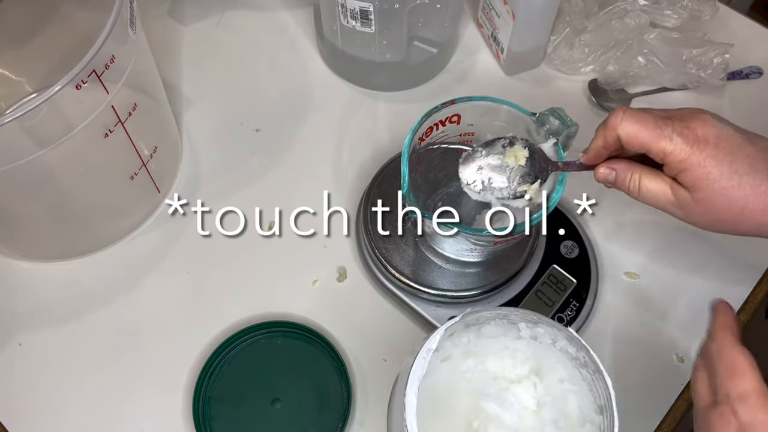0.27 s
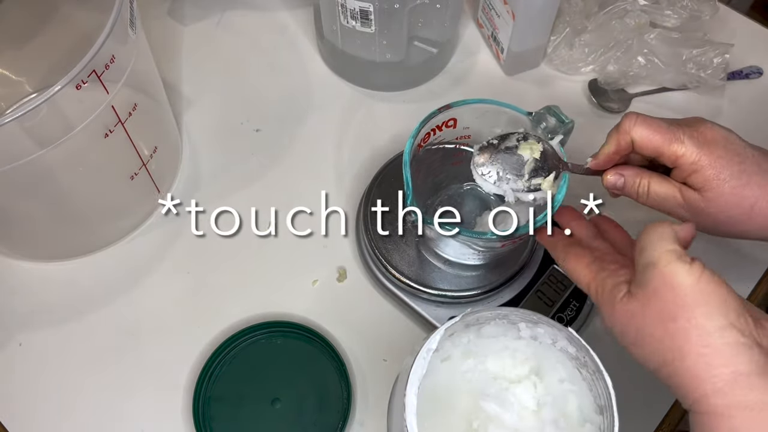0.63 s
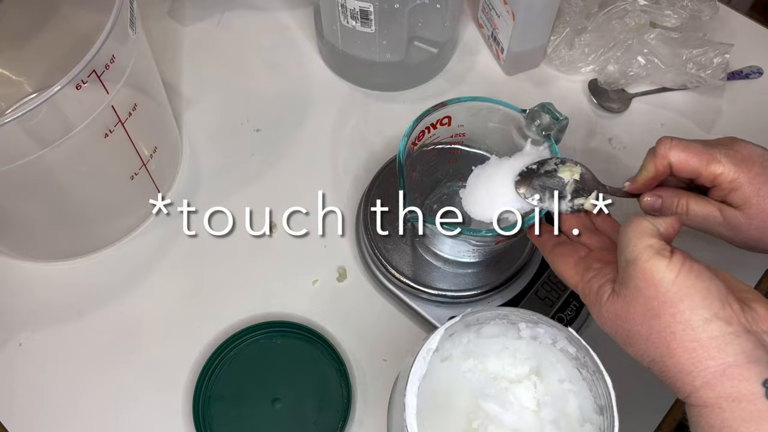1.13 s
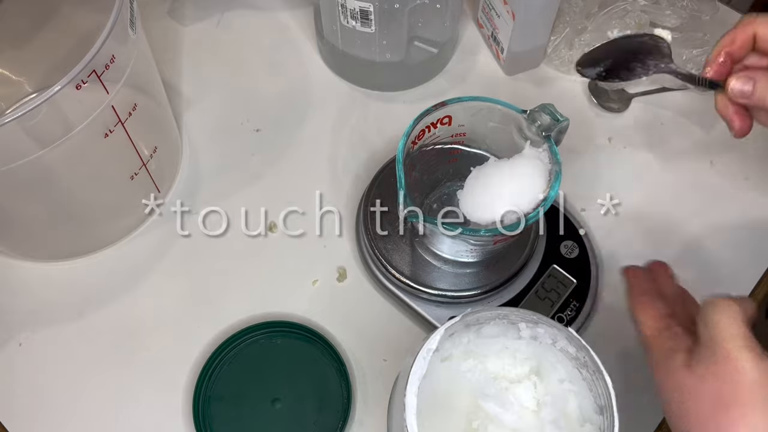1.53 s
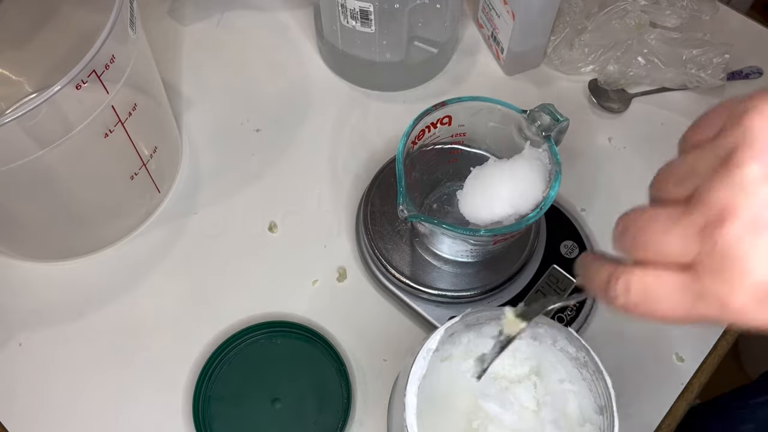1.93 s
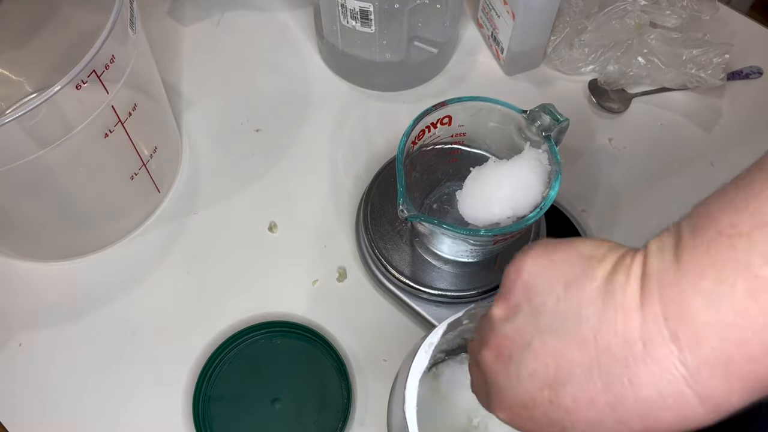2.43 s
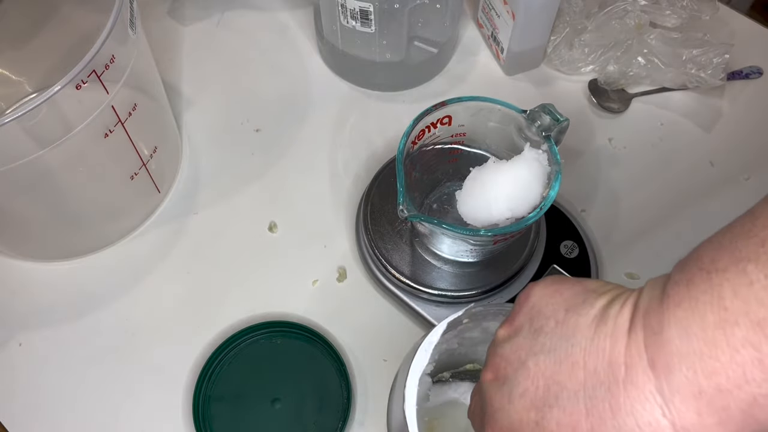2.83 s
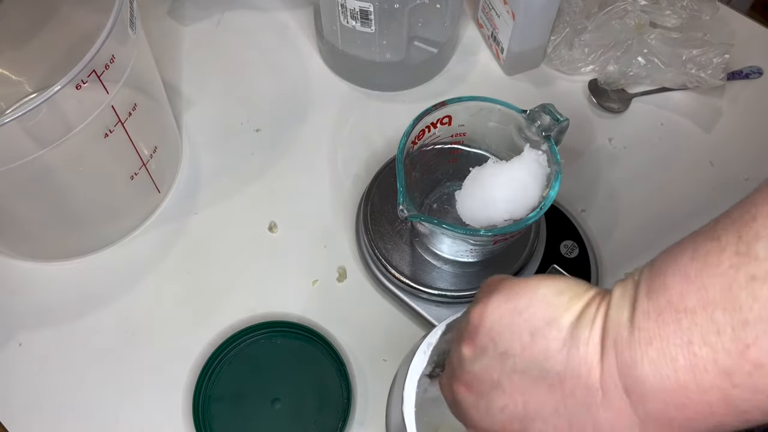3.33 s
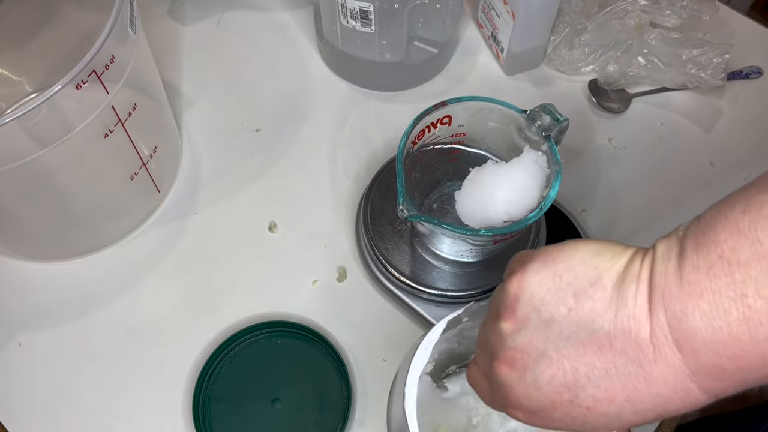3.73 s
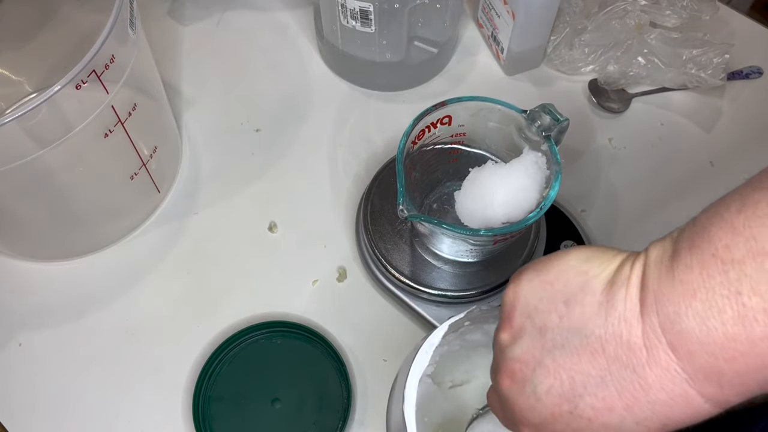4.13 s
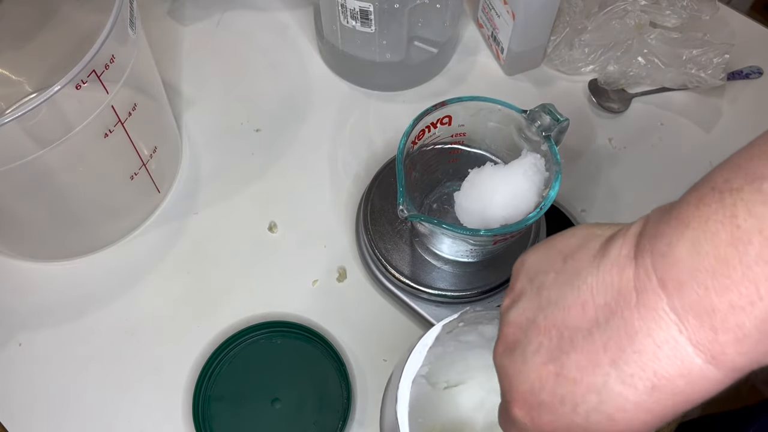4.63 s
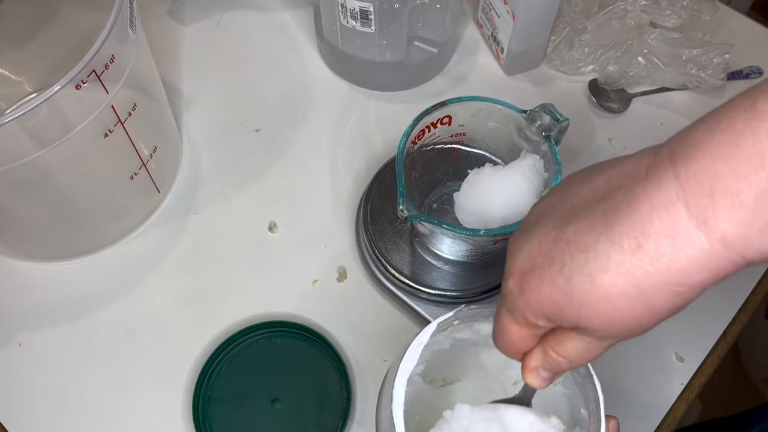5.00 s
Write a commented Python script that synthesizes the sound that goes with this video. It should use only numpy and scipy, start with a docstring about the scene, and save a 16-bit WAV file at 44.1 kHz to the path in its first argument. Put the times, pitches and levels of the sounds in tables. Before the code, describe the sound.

Quiet close kitchen handling: greasy rubbing and tiny clicks, a spoon digging in a tub of solid oil, one hard clack near the end.

```python
"""Spoon on glass jug and plastic tub of solid fat

A spoon taps a glass jug, a finger wipes solid oil off the spoon, then it digs into a plastic tub on a counter.
Blows ring sums of decaying modes; grains of noise make fat and skin rub and crackle, gliding tones squeak.
Small ticks sound during the wipe, later on the tub, with one hard knock; decaying noise is the small hard room.
An appliance hums and whines below, made of narrow noise and a wavering sine; two close microphone ports hear it.
"""
import sys
import numpy as np
from scipy import signal
from scipy.fft import rfft, irfft, next_fast_len
from scipy.io import wavfile

SR = 44100
rng = np.random.default_rng(int(sys.argv[2]) if len(sys.argv) > 2 else 0)


def undo_db(level):
    """Turn decibels back into plain size, where 20 dB means ten times bigger."""
    steps = np.asarray(level, float) / 20
    return 10 ** steps


def inscribe(sig):
    """Save sig as 16-bit PCM at rate SR to the path in sys.argv[1].

    A 1-D sig is mono; a 2-D sig holds one channel per row.
    Samples are clipped to [-1, 1] before scaling.
    """
    pcm = np.round(np.clip(np.atleast_2d(sig).T, -1, 1) * 32767)
    wavfile.write(sys.argv[1], SR, pcm.astype(np.int16))


N = 231966


def unit_rms(x):
    """Normalisation: scale a signal to unit root mean square."""
    return x / np.sqrt(np.mean(x ** 2) + 1e-20)


def at_hz(points, hz):
    """Logarithmic interpolation: read a spectrum along a log-frequency axis."""
    points = np.array(points)
    return np.interp(np.log(hz), np.log(points[:, 0]), points[:, 1])


def drift(rate_hz):
    """Low-passed random process: two equal poles leave only slow fluctuation, of unit rms."""
    stride = 40   # computed at every 40th sample, then interpolated
    pole = np.exp(-2 * np.pi * rate_hz * stride / SR)
    white = rng.standard_normal(N // stride + 2002)
    slow = signal.lfilter([1], [1, -2 * pole, pole ** 2], white)[2000:]
    return np.interp(np.arange(N) / stride, np.arange(len(slow)), unit_rms(slow))


def ring(force, hz, t60_s):
    """Damped oscillator: a unit click starts a decaying sine of height 1."""
    radius = undo_db(-60 / (t60_s * SR))
    angle = 2 * np.pi * hz / SR
    feedback = [1, -2 * radius * np.cos(angle), radius ** 2]
    return signal.lfilter([0, np.sin(angle)], feedback, force + 1e-18)


def resonance(x, hz, width_hz):
    """Resonance bandwidth: damping sets the width of the band passed; unit rms."""
    return unit_rms(ring(x, hz, np.log(1000) / (np.pi * width_hz)))


def left_right(mid, side, likeness):
    """Interchannel correlation: the balance of mid and side power sets how alike left and right are."""
    return np.sqrt(1 + likeness) * mid + np.sqrt(1 - likeness) * side * [[1], [-1]]


def band_pass(x, low_hz, high_hz):
    """Band filtering: pass the frequencies between two edges."""
    return signal.sosfilt(signal.butter(2, [low_hz, high_hz], "band", fs=SR, output="sos"), x)


def coloured(white, spectrum, patchy_db, likeness):
    """Spectral shaping: third-octave bands of (draw, mid/side) noise flicker separately; unit rms."""
    out = 0
    edges_hz = 16 * 2 ** np.arange(0, 9.9, 1 / 3)
    for k, (low, high) in enumerate(zip(edges_hz, edges_hz[1:])):
        hz = np.sqrt(low * high)
        flicker = drift(30)
        if spectrum[0][0] < hz < spectrum[-1][0]:
            mid, side = band_pass(white[k % 2], low, high)   # neighbouring bands use separate draws
            alike = np.clip(at_hz(likeness, hz), -1, 1)
            gain = undo_db(at_hz(spectrum, hz) + patchy_db * flicker)
            out = out + gain * left_right(mid, side, alike)
    return unit_rms(out)


def strike(times_s, levels_db, modes, spread_db, force):
    """Modal excitation: every blow, of shape force[k], drives each mode with a strength of its own."""
    out = np.zeros(N)
    chance_db = rng.normal(0, spread_db, (len(times_s), len(modes)))
    for m, (hz, mode_db, t60_s) in enumerate(modes):
        push = np.zeros(N)
        for k, s in enumerate(times_s):
            i = round(s * SR)
            level_db = levels_db(hz)[k] + mode_db + chance_db[k, m]
            push[i:i + len(force[k])] += undo_db(level_db) * np.asarray(force[k])
        out += (-1) ** m * ring(push, hz, t60_s)   # neighbouring modes move against each other
    return out


def swells(start_s, length_s, level_db):
    """Amplitude envelope: each row swells, holds and fades by one rule; rows add in power."""
    rise_share, fall_share = 0.27, 0.57   # parts of the length spent swelling and fading
    stride = 32
    t = np.arange(0, N + stride, stride) / SR
    part = (t - np.reshape(start_s, (-1, 1))) / np.reshape(length_s, (-1, 1))
    shape = np.clip(np.minimum(part / rise_share, (1 - part) / fall_share), 0, 1) ** 2
    gain = np.sqrt(np.sum((undo_db(level_db)[:, None] * shape) ** 2, axis=0))
    return np.interp(np.arange(N) / stride, np.arange(len(gain)), gain)


# Spectral density of the rumble before it is scaled to unit rms: frequency_hz, density_db
RUMBLE_SPECTRUM = [(15, -54.5), (30, -17), (48, -7.5), (80, -5), (160, -2.5), (290, -8), (420, -9.5),
                   (520, -14), (1000, -19.5), (2000, -26.5), (3000, -36), (4000, -42), (6000, -48),
                   (13000, -50.5)]
# Correlation of left and right in diffuse sound, also used by kitchen(): frequency_hz, likeness (1 = identical)
DIFFUSE_LIKENESS = [(60, 0.98), (130, 0.95), (290, 0.69), (640, -0.22), (1400, -0.22), (2500, 0.87),
                    (5000, 0.1), (8000, 0.92), (12000, 1)]
# Wavering rms level of the mains hum: time_s, level_db
MAINS_LEVEL = [(0.0, -52), (0.1, -53.5), (0.23, -69), (0.6, -53.5), (0.97, -62), (1.02, -55.5), (1.62, -68),
               (1.71, -58), (2.42, -56), (2.59, -63), (3.69, -54.5), (3.91, -73), (4.09, -55.5),
               (4.53, -55), (4.61, -59.5), (5.26, -64)]
# Faint overtones of the hum, and the whine: frequency_hz, width_hz (of each of two resonances), level_db
OVERTONES = [(109, 10, -83), (185, 14, -64), (233.2, 11, -64), (295.3, 9, -67), (399.7, 10, -67),
             (8354, 280, -84)]


def room_tone():
    """Stationary noise and tones: low house rumble, wavering mains hum, faint overtones and a thin whine."""
    rumble_db, mains_hz = -54.5, 59.6
    rumble = coloured(rng.standard_normal((2, 2, N)), RUMBLE_SPECTRUM, patchy_db=1.9, likeness=DIFFUSE_LIKENESS)
    level_db = np.interp(np.arange(N) / SR, *np.transpose(MAINS_LEVEL))
    phase = 2 * np.pi * np.cumsum(mains_hz + 0.66 * drift(1.22)) / SR
    mains = undo_db(level_db) * np.sqrt(2) * np.sin(phase)
    overtones = 0
    for hz, width_hz, db in OVERTONES:
        narrow = resonance(rng.standard_normal(N), hz, width_hz)
        overtones = overtones + undo_db(db) * resonance(narrow, hz, width_hz)
    return undo_db(rumble_db) * rumble + mains + overtones


# Reverberation time: frequency_hz, t60_s
REVERB_TIME = [(200, 0.39), (600, 0.27), (1500, .44), (3000, 0.52), (8000, 0.33), (12000, .3)]
# Spectral density of the reflections before scaling to unit energy: frequency_hz, density_db
REVERB_COLOUR = [(200, -2.5), (600, 7.5), (900, 3), (1300, 4.5), (2000, -0.5), (4000, -6), (7000, 1),
                 (12000, -5)]


def kitchen(x):
    """Diffuse reverberation: noise sets in as the first walls answer and decays at each band's own rate."""
    t = np.arange(SR // 2) / SR
    onset = 1 - np.exp(-(t / 0.002) ** 2)
    edges_hz = 180 * 2 ** np.arange(0, 6.6, .5)
    white = rng.standard_normal((2, 2, len(t)))
    response = 0
    for k, (low, high) in enumerate(zip(edges_hz, edges_hz[1:])):
        mid, side = band_pass(white[k % 2], low, high)
        hz = np.sqrt(low * high)
        alike = np.clip(at_hz(DIFFUSE_LIKENESS, hz), -1, 1)
        fade = undo_db(at_hz(REVERB_COLOUR, hz) - 60 * t / at_hz(REVERB_TIME, hz)) * onset
        response = response + fade * left_right(mid, side, alike)
    response = response / np.sqrt(np.sum(response ** 2) / 2)
    return signal.fftconvolve(x[None], response, axes=1)[:, :N]


# Low bumps passed to the counter by jug, tub and spoon:
# start_s, level_db (lowered below by 6), hardness_db (added to modes above 500 Hz)
COUNTER_BUMPS = [(.037, -43.5, -21), (0.061, -36, -18), (2.232, -37.5, -15), (2.285, -27, -2),
                 (2.255, -49, -7), (2.311, -45, -3), (2.326, -31, -24), (2.359, -44, -21),
                 (3.147, -39, -13), (3.331, -39.5, -17), (4.58, -28, -8)]
# Modes of the counter: pitch_hz, level_db (relative to the bump), t60_s
COUNTER_MODES = [(88.5, -5.5, 0.12), (119, -2, 0.078), (194, -1, 0.11), (236.2, -13, 0.2),
                 (345, -1.5, 0.054), (657, -1, .05), (891, 5, 0.042), (1963, -10, 0.018)]


def counter():
    """Contact hardness: soft bumps drive the low modes; only the harder ones reach the upper modes."""
    s, level_db, hardness_db = np.transpose(COUNTER_BUMPS)
    return strike(s, lambda hz: level_db - 6 + hardness_db * (hz > 500), COUNTER_MODES, spread_db=3.5,
                  force=[np.hanning(12) / 5.34] * len(s))


# Spoon on jug: start_s, level_db, top_db (added to modes above 8 kHz)
JUG_CLINKS = [(0.0359, -42.5, 6), (.1215, -61, -19), (0.172, -64, 1), (0.2269, -58.5, 1)]
# Modes of jug and spoon: pitch_hz, level_db (relative to the clink), t60_s
JUG_MODES = [(540, 5, 0.015), (874, 3.5, 0.058), (1550, -1.5, 0.071), (1915, -1.5, 0.039),
             (2330, -2, 0.014), (3700, 13, 0.0073), (3940, -6.5, 0.17), (4480, 2.5, .1),
             (5450, 5.5, 0.0069), (6000, -3.5, 0.21), (6750, -8.5, 0.058), (7574, -12, 0.14),
             (9020, -6, 0.025), (9900, -6, 0.075), (11520, -9, 0.054)]


def jug():
    """Impulsive excitation: short touches of steel on glass, the first brightest on top, the second dullest."""
    s, level_db, top_db = np.transpose(JUG_CLINKS)
    return strike(s, lambda hz: level_db + top_db * (hz > 8000), JUG_MODES, spread_db=1.5, force=[[1.]] * len(s))


# Squeaks on fat: start_s, length_s, first_hz, last_hz, level_db
FAT_SQUEAKS = [(0.444, 0.2, 3100, 3070, -71), (1.095, .118, 3060, 2600, -59),
               (1.211, 0.071, 3000, 3030, -58.5), (1.261, .09, 2960, 3000, -72.5),
               (2.542, 0.037, 1683, 1663, -57), (2.652, 0.092, 1706, 1673, -63.5)]


def squeaks(slips):
    """Stick-slip friction: a gliding tone flutters with the slips of skin or steel on fat."""
    start_s, length_s, first_hz, last_hz, level_db = np.transpose(FAT_SQUEAKS)
    flutter = unit_rms(signal.lfilter([1], [1, -np.exp(-2 * np.pi * 50 / SR)], slips))
    # start and end of each squeak, interleaved
    turn_s = np.ravel([start_s, start_s + length_s], "F")
    turn_hz = np.ravel([first_hz, last_hz], "F")
    pitch_hz = np.interp(np.arange(N) / SR, turn_s, turn_hz)
    tone = np.sqrt(2) * np.sin(2 * np.pi * np.cumsum(pitch_hz) / SR)
    return swells(start_s, length_s, level_db) * flutter * tone


def grit(per_s, uneven_db):
    """Random pulse train: dense tiny slips of uneven size come in clumps, as two draws of mid and side."""
    shape = (2, 2, N)
    born = rng.random(shape) < per_s * undo_db(3.0 * drift(40)) / SR
    size = undo_db(uneven_db * np.minimum(rng.exponential(1, shape), 4))
    return born * size * rng.choice([-1, 1], shape) + 1e-18


# Strokes of skin or spoon through fat, and a soft breath-like rustle near 0.6 s:
# start_s, length_s, dull_db, bright_db
RUB_STROKES = [(-.08, 0.52, -61, -68.5), (0.12, 0.59, -65, -65.5), (0.57, 0.54, -64, -81),
               (0.84, 0.25, -67, -68), (0.98, 0.43, -65, -65.5), (1.201, 0.088, -71, -63),
               (1.38, 0.54, -69.5, -67), (1.91, 0.5, -71, -75), (2.19, 0.29, -64.5, -65.5),
               (2.485, 0.35, -74, -68.5), (2.744, 0.15, -81, -82), (2.892, 0.13, -79, -73.5),
               (2.958, 0.28, -76.5, -75.5), (3.137, 0.13, -60, -64), (3.193, 0.34, -81.5, -74),
               (3.477, 0.28, -69.5, -78), (3.756, 0.17, -75, -79), (3.936, 0.11, -72, -72),
               (4.05, 0.25, -76.5, -83), (4.185, 0.32, -73, -69.5), (4.45, 0.18, -85, -75)]
# Spectra of dull and bright rubbing before scaling to unit rms: frequency_hz, density_db
DULL_SPECTRUM = [(500, 1.5), (900, -2.5), (1700, 8), (2400, 1.5), (3600, -3), (5000, -0.5), (7000, -16)]
BRIGHT_SPECTRUM = [(4000, -23.5), (6000, -4), (7500, -14), (9000, 4.5), (11000, 5), (12800, -14)]
# Resonances of the singing spoon: pitch_hz, width_hz, level_db (relative to each other)
SPOON_MODES = [(895, 150, 7), (1580, 89, -20), (5000, 860, -0.5), (7800, 750, 1.5), (9000, 150, -20),
               (11040, 300, 0)]


def rubbing():
    """Friction noise: dull and bright grit swells with each stroke, with wall scrape and spoon song."""
    scrape_from_s = 2.4                        # from here on the spoon scrapes the tub
    wipe_start_s, wipe_end_s, sing_db = .93, 1.3, -5.0   # the spoon sings while the finger wipes it
    start_s, length_s, dull_db, bright_db = np.transpose(RUB_STROKES)
    press = swells(start_s, length_s, dull_db)
    t = np.arange(N) / SR
    near = [(500, 0.55), (3000, 0.88), (9000, 0.99)]   # frequency_hz, left-right likeness
    dull = coloured(grit(5000, uneven_db=4.5), DULL_SPECTRUM, patchy_db=2.5, likeness=near)
    bright = coloured(grit(8000, uneven_db=2.5), BRIGHT_SPECTRUM, patchy_db=-1.5, likeness=near)
    slips = grit(1700, uneven_db=3.5)[0]
    wall = sum(undo_db(db + 3.0 * drift(18)) * ring(slips[0], hz, t60_s) for hz, db, t60_s in TUB_MODES[3:])
    wall = unit_rms(wall) * (t > scrape_from_s)
    sing = sum(undo_db(db + 3 * drift(10)) * resonance(slips[1], hz, width_hz) for hz, width_hz, db in SPOON_MODES)
    sing = undo_db(sing_db) * sing * (t > wipe_start_s) * (t < wipe_end_s)
    return press * (dull + wall + sing) + swells(start_s, length_s, bright_db) * bright + squeaks(slips[1])


def contact(ms):
    """Rough contact: a noisy force swells and dies within some milliseconds; unit energy."""
    t = np.arange(600) / SR * 1000 / np.clip(np.reshape(ms, (-1, 1)), .1, 5)   # in contact lengths
    force = t * np.exp(-2 * t) * rng.standard_normal(t.shape)
    return force / np.sqrt(np.sum(force ** 2, axis=1, keepdims=True))


# Small ticks of finger and spoon during the wipe, later of spoon against the tub:
# start_s, crack_db (peak before the high-pass), wall_db, contact_ms
SMALL_TICKS = [(0.8954, -40.5, -50.5, 2.8), (1.0849, -56, -72, 2), (1.1069, -37.5, -74, 1.3),
               (1.2146, -44, -70, 2), (1.2475, -39.5, -70, 4.4), (2.2224, -50, -63.5, 3.4),
               (2.2524, -45, -74, 3), (2.2845, -37.5, -52, 4.7), (2.575, -41.5, -74, 2.6),
               (2.613, -32.5, -55, 2), (2.6284, -41, -68, 2), (3.0175, -49, -74, 2.7),
               (3.094, -52, -80, 3.4), (3.3817, -40.5, -62, 1.7), (3.4035, -43, -83, 1.5),
               (3.4293, -41, -84, 1.4), (3.5613, -44, -81, 1), (3.6075, -48.5, -57, 2),
               (3.8145, -46, -72, 0.91), (3.973, -29, -43.5, 1.84), (3.9766, -20.5, -45, 1.8),
               (3.9793, -38, -54, 3), (4.1687, -62, -64, 1.36), (4.278, -45.5, -64, 3),
               (4.3469, -38.5, -59, 1.5), (4.3547, -50, -71, 1.9), (4.367, -43.5, -63, 1.5),
               (4.5498, -42, -68, 3.4), (4.564, -31.5, -38.5, 4.8), (4.5753, -5.5, -11.5, 2.5)]
# Modes of the tub, three of the belly and then those of the wall, also scraped in rubbing():
# pitch_hz, level_db (relative to the blow), t60_s
TUB_MODES = [(222, -6, .09), (298, 2, .08), (570, 4, .045), (1170, -11, .012), (1450, -14, .01),
             (1680, -7, .022), (1850, -4, .013), (2200, -2, .011), (2650, 1, .01), (3250, -1, .01),
             (3620, 4, .01), (4250, -3, .008), (4700, -12, .006), (5300, -13, .006)]


def ticks():
    """Impact radiation: each tick cracks and rings wall and belly modes, as heard close by and all round."""
    crack_all_round_db, slap_all_round_db = 7, 25   # summed over all directions, both are broad bands
    slap_band_hz, belly_db, wall_to_room_db = (1480, 4470), -3.5, -13
    s, crack_db, wall_db, contact_ms = np.transpose(SMALL_TICKS)
    force = contact(contact_ms)
    cracks = np.zeros((2, N))   # close by, all round
    for k in range(len(s)):
        i = round(s[k] * SR)
        cracks[1, i] = undo_db(crack_db[k] + crack_all_round_db)
        cracks[0, i:i + force.shape[1]] += undo_db(crack_db[k]) * force[k] / np.abs(force[k]).max()
    cracks = signal.sosfilt(signal.butter(2, 7000, "high", fs=SR, output="sos"), cracks)

    click = [[1.]] * len(s)
    wall = 0
    # the wall modes are set off three times, the second time strongest
    for share, gain_db in [(.3, -10), (.7, 0), (1.6, -8)]:
        times_s = s + share * contact_ms / 1000
        wall = wall + strike(times_s, lambda hz: wall_db + gain_db, TUB_MODES[3:], spread_db=2.0, force=click)

    shove = np.hanning(60) / 30   # the belly follows a slower, smooth push
    belly = strike(s + 0.0031, lambda hz: wall_db + belly_db, TUB_MODES[:3], spread_db=3.5,
                   force=[shove] * len(s))
    slap = np.zeros(N)
    slap[(s * SR).astype(int)] = undo_db(wall_db + slap_all_round_db)
    slap = signal.lfilter(*signal.butter(1, slap_band_hz, "band", fs=SR), slap)
    close_by = cracks[0] + wall + belly
    all_round = cracks[1] + undo_db(wall_to_room_db) * wall + slap + belly
    return close_by, all_round


def scene():
    """Superposition: all blows share the room, small bodies radiate no deep bass, rubbing and tone lie beside."""
    room_send_db = -10.5
    toward_ports, all_round = ticks()
    others = jug() + counter()
    no_bass = signal.butter(2, 90, "high", fs=SR, output="sos")
    near, far = signal.sosfilt(no_bass, [others + toward_ports, others + all_round])
    return near + undo_db(room_send_db) * kitchen(far) + rubbing() + room_tone()


def low_pass(x):
    """Removes everything above the highest recorded frequency."""
    return signal.sosfilt(signal.butter(12, 17290, fs=SR, output="sos"), x)


# Phase by which the left port leads the right: frequency_hz, lead_rad
PORT_PHASE = [(0, 0), (1000, -.2), (1700, -.4), (2400, .5), (3100, .9), (5900, .6), (6600, .1), (7900, .65),
              (8600, 0), (9300, -1.6), (10250, -3.14), (11400, -5.1), (12100, -6.28), (14000, -8)]
# Level of the left port over the right: frequency_hz, level_db
PORT_LEVEL = [(60, 2.5), (250, 0), (1500, 1.5), (3000, 2), (6000, 3.5), (8500, 0), (13000, 0)]


def record(dry):
    """Cavity resonance: ports differing in phase and level ring in the treble, below a steep top cut."""
    cavity_hz, cavity_width_hz, cavity_db, cutoff_hz = 10770, 1600, 10.5, 12000
    size = next_fast_len(N + 4096)
    hz = np.arange(size // 2 + 1) * SR / size
    # each port takes half of the difference
    lead_rad = np.interp(hz, *np.transpose(PORT_PHASE))
    half = undo_db(at_hz(PORT_LEVEL, hz + 1) / 2) * np.exp(.5j * lead_rad)
    cavity = undo_db(cavity_db / (1 + (2 * (hz - cavity_hz) / cavity_width_hz) ** 2))
    top = undo_db(-31) + 1 / (1 + (hz / cutoff_hz) ** 60)   # the cut leaves a faint remainder
    heard = irfft(rfft(dry, size) * cavity * top * [half, 1 / half], size)[:, :N]
    return low_pass(heard)


dry = scene()
out = record(dry)
inscribe(out)
```